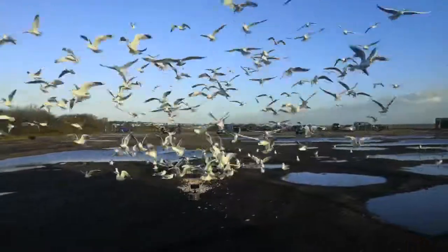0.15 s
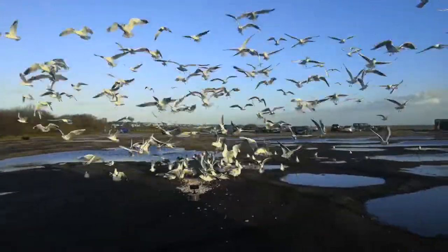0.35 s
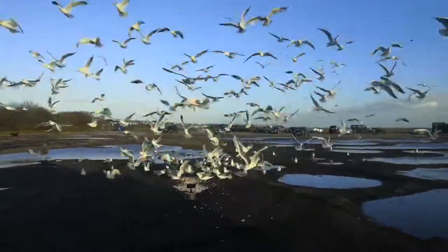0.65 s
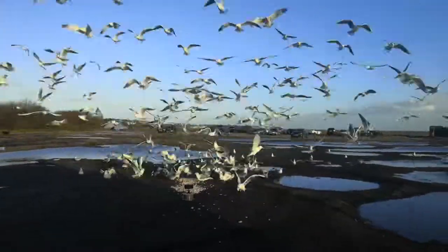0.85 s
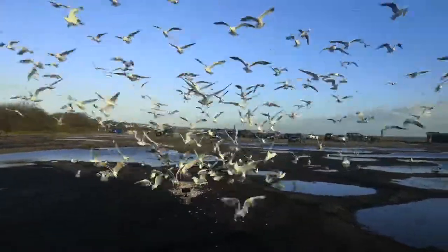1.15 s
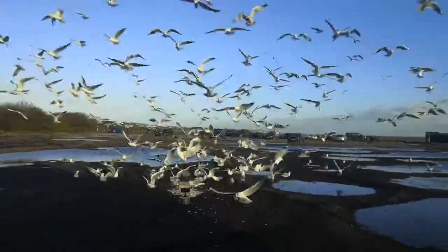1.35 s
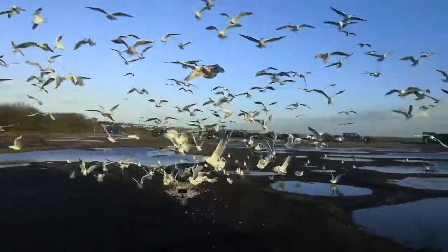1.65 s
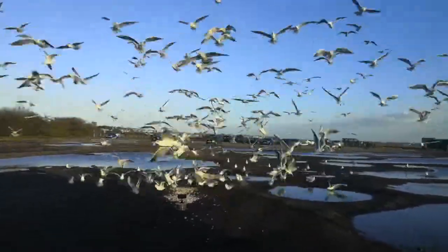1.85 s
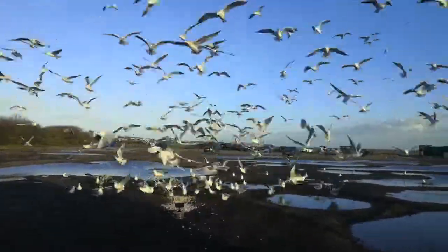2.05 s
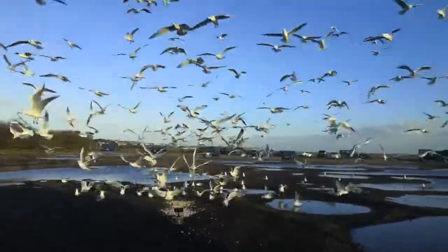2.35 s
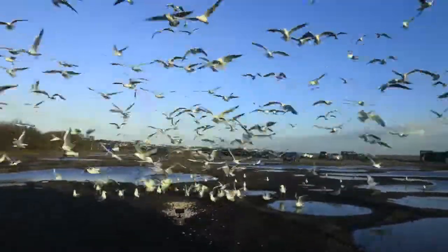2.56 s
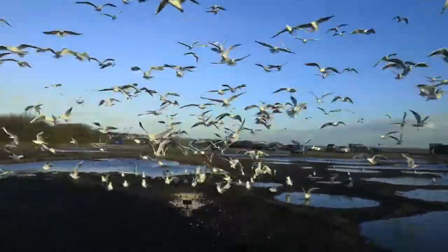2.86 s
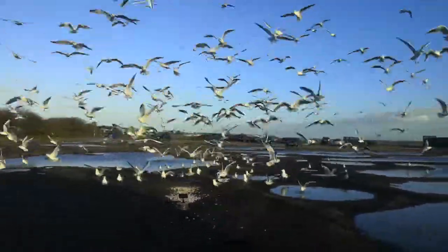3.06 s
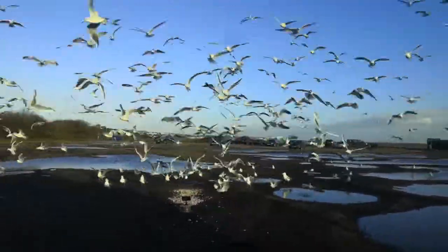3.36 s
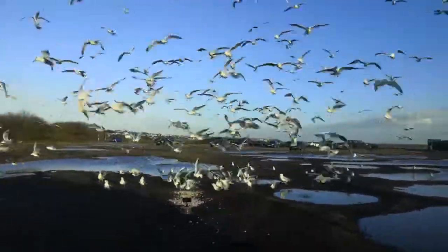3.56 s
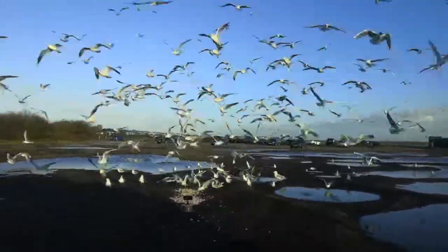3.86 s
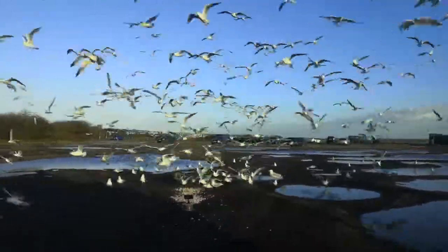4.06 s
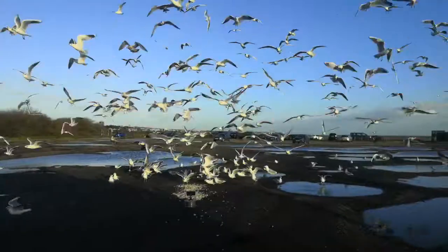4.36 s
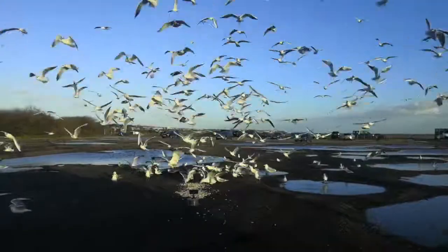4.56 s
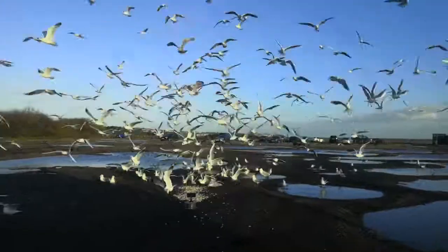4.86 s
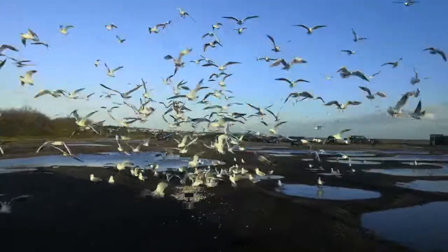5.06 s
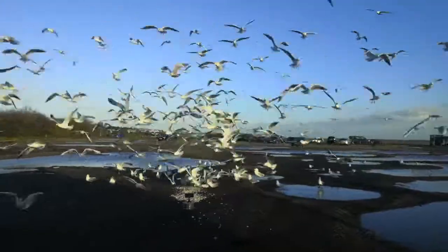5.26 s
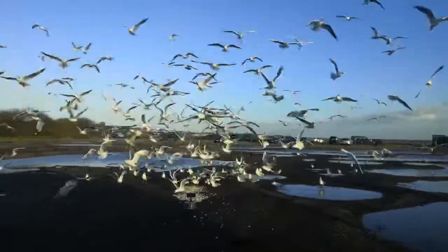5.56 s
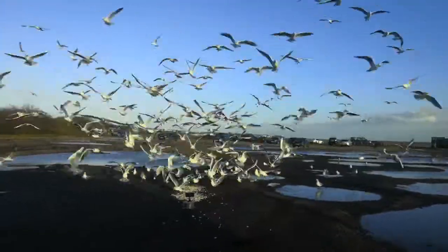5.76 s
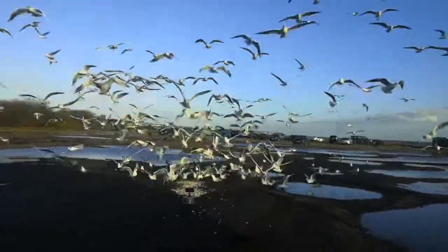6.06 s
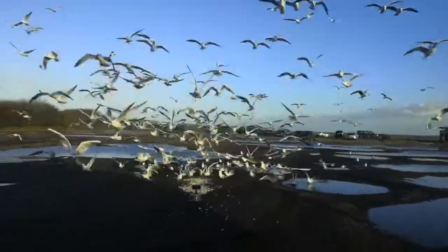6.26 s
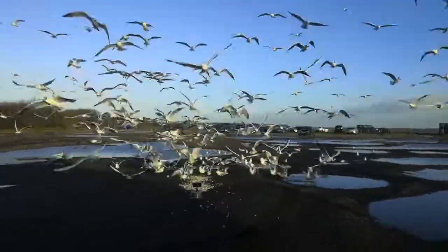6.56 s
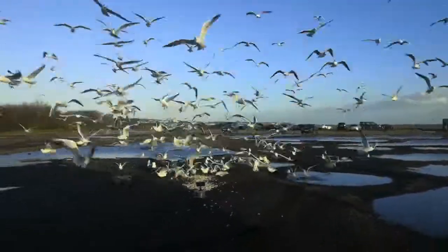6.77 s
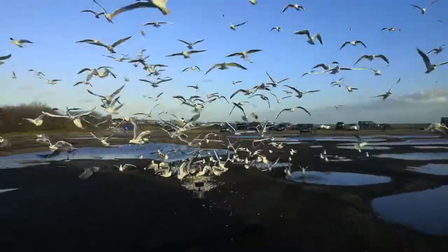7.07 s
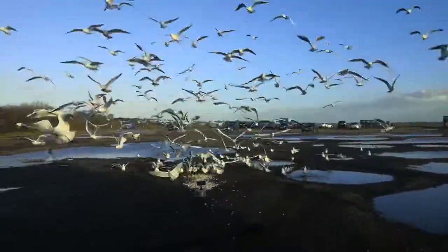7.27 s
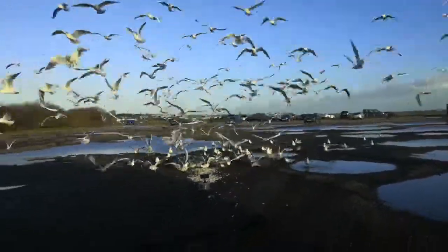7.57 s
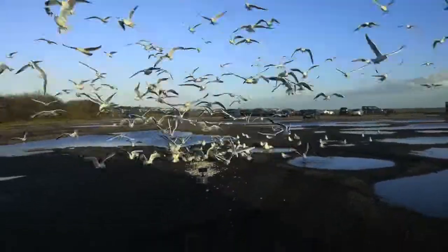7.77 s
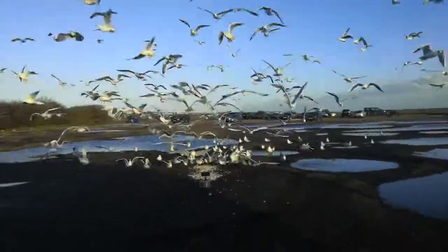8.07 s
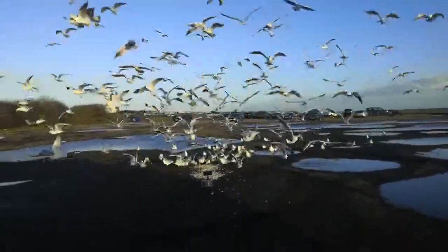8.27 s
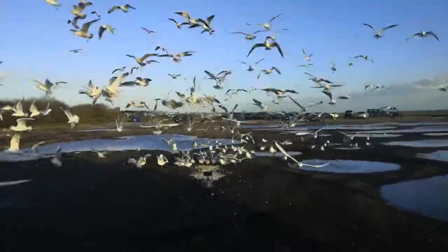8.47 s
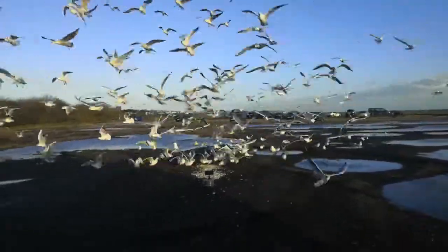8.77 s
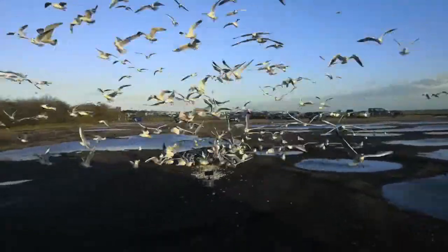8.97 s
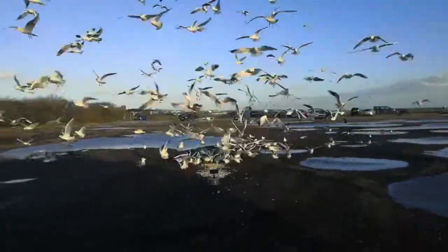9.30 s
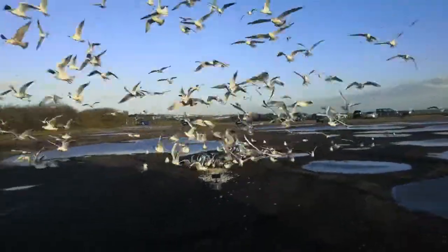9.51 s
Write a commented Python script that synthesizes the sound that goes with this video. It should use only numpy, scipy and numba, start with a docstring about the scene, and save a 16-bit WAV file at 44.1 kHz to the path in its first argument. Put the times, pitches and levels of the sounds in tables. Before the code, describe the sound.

Close, muffled thumps and knocks on a car body stand out over many gulls crying hoarsely in light wind.

```python
"""Gulls over a wet car park

A dense flock screams around two spaced microphones at a car, and near birds stand out of the mass.
Each cry is a harmonic tone from the syrinx, roughened by fluttering membranes and filtered by the throat.
Knocks and thumps excite the damped modes of the bodywork, over gusty wind rumble and far hiss."""
import sys
import numpy as np
from scipy import signal
from scipy.fft import rfft, irfft, next_fast_len
from scipy.io import wavfile
from scipy.ndimage import uniform_filter1d
from numba import njit

SR = 44100
rng = np.random.default_rng(int(sys.argv[2]) if len(sys.argv) > 2 else 0)


def unload_audio(sound):
    """Save the sound as a 16-bit wav file, at the path given as the first command line argument."""
    columns = np.transpose(np.atleast_2d(sound))
    # keep every value between -1 and 1, then stretch to whole-number steps
    steps = np.round(np.clip(columns, -1, 1) * 32767)
    wavfile.write(sys.argv[1], SR, steps.astype(np.int16))


N = 425124
SPACING = 34  # sound travel time between the microphones [samples]


def undb(db):
    """Amplitude ratio of a level in decibels."""
    return 10 ** (np.asarray(db) / 20)


def shape(hz, spectrum):
    """Spectral envelope [dB], interpolated on a logarithmic frequency axis."""
    points_hz, db = np.transpose(spectrum)
    return np.interp(np.log(np.maximum(hz, 1)), np.log(points_hz), db)


def noise(spectrum):
    """White noise filtered by a spectral envelope, at unit rms."""
    size = next_fast_len(N)
    gain = undb(shape(np.fft.rfftfreq(size, 1 / SR), spectrum))
    x = irfft(rfft(rng.standard_normal(size)) * gain, size)[:N]
    return x / x.std()


def jitter(rate):
    """Low-pass random modulation: values held 1 / rate s and smoothed, with a spread near 1."""
    hold = int(SR / rate)
    steps = np.repeat(rng.standard_normal(N // hold + 1), hold)
    return 1.372 * uniform_filter1d(uniform_filter1d(steps, hold), hold)[:N]


def curve(table):
    """Linear interpolation of each column over time."""
    times, *columns = np.transpose(table)
    return [np.interp(np.arange(N) / SR, times, column) for column in columns]


def add(out, x, start, pan_db=0., lag=0):
    """Direction as level and time difference: the left is pan_db louder and lag samples later."""
    for ch, sign in enumerate((1, -1)):
        i = int(start * SR) + max(sign * lag, 0)
        part = x[max(-i, 0):max(N - i, 0)]
        out[ch, max(i, 0):max(i, 0) + len(part)] += part * undb(sign * pan_db / 2)


def highpass(x, hz):
    """Third-order roll-off: 18 dB per octave below the cutoff."""
    return signal.sosfilt(signal.butter(3, hz, "high", fs=SR, output="sos"), x)


@njit
def harmonics(cycles, envelope, gain):
    """Fourier synthesis on a common phase, one column of harmonic gains per output."""
    out = np.zeros((gain.shape[1], len(cycles)))
    for i in range(len(cycles)):
        fundamental = np.exp(2j * np.pi * cycles[i])
        partial = fundamental
        for k in range(len(gain)):
            for band in range(gain.shape[1]):
                out[band, i] += gain[k, band] * partial.imag * envelope[i]
            partial *= fundamental
    return out


def syrinx(length, pitch, filters, shake, hoarse, warble, chance):
    """Source and filter: fluttering membranes modulate a harmonic tone in frequency and amplitude."""
    n = int(length * SR)
    i = int(chance[0] * (N - 2 * n))
    t = np.arange(n) / SR
    glide = np.interp(t, [0, length / 2, length], pitch)
    vibrato = warble * np.sin(2 * np.pi * (24 * t + chance[1]))
    hz = glide * (1 + vibrato + .06 * hoarse ** 3 * shake[i:i + n])
    flutter = np.sin(2 * np.pi * (70 + 60 * chance[2]) * t) + .95 * shake[i + n:i + 2 * n]
    swell = np.sin(np.pi * t / length).clip(0) ** .55
    envelope = swell * undb(7 * hoarse * (np.minimum(flutter, 1.1) - .45))
    partial_hz = np.arange(1, int(11000 / max(pitch))) * pitch[1]
    gains = undb(np.transpose([response(partial_hz) for response in filters]))
    return harmonics(np.cumsum(hz) / SR, envelope, gains)


# Swell of the flock: (time [s], throat band level [dB], shrill band level [dB])
FLOCK_LEVELS = [(0, -73, -66), (.48, -65, -65), (.6, -81, -73.5), (.78, -68, -66), (.92, -87, -76),
                (1.22, -61, -58), (1.42, -84, -75), (1.58, -62, -57.5), (1.7, -73.5, -73),
                (2.3, -79, -74.5), (3.0, -67, -60.5), (3.7, -72.5, -71.5), (4.1, -61.5, -61.5),
                (4.7, -69.5, -69), (5.0, -52.5, -60.5), (5.3, -58, -61.5), (5.75, -67.5, -66.5),
                (6.1, -65.5, -64.5), (7.5, -68, -68), (8.4, -67.5, -68.5), (8.56, -57, -58.5),
                (8.9, -61, -61.5), (9.08, -69, -69.5), (9.64, -70, -63)]
# Spectral envelopes of the two bands: (frequency [Hz], relative level [dB])
THROAT_SPECTRUM = [(410, -61), (700, -51.5), (1130, -18), (1240, -35.5), (1360, -9), (2450, 3), (2730, 1),
                   (3450, -7), (4500, -44.5), (5850, -64.5), (9900, -120)]
SHRILL_SPECTRUM = [(2240, 8), (3800, -1), (4340, -9), (5050, -8.5), (5500, -13), (7740, -11.5),
                   (11000, -14.5), (14300, -58), (22000, -120)]
CRIES_PER_S = 100
YELP_ARCH = np.array([.98, 1, .955])  # pitch ratio at start, middle and end


def flock():
    """Incoherent summation: hundreds of short hoarse cries from all sides merge into one mass."""
    low, high, shake = np.zeros((2, N)), np.zeros((2, N)), jitter(500)
    for chance in rng.random((int(CRIES_PER_S * N / SR), 13)):
        pitch = 560 * 2 ** (1.2 * chance[3]) * (1 + .089 * (chance[4:7] - .5)) * YELP_ARCH
        throat_hz = 1700 * 2 ** (1.21 * chance[10] ** 1.7)  # each bird favours its own bands
        shrill_hz = 4300 * 2 ** (.62 * chance[11])
        filters = [
            lambda f: shape(f, THROAT_SPECTRUM) - 5 * np.minimum((np.log2(f / throat_hz) / .32) ** 2, 3),
            lambda f: shape(f, SHRILL_SPECTRUM) - 5 * np.minimum((np.log2(f / shrill_hz) / .5) ** 2, 3)]
        gain = undb(-2.5 * np.log(chance[7] + .046))
        length, hoarse = .035 + .13 * chance[8] ** 3, .45 + .4 * chance[12]
        throat, shrill = gain * syrinx(length, pitch, filters, shake, hoarse, warble=.012, chance=chance)
        start, side = chance[0] * (N / SR + .2) - .2, 2 * chance[9] - 1
        add(low, throat, start, 5 * side, lag=int(-SPACING * side))
        add(high, shrill, start, 5 * side, lag=int(-SPACING * side))
    bands = highpass([low, high], 1100)  # small throats carry no bass
    levels = uniform_filter1d(curve(FLOCK_LEVELS), SR // 20)
    out = np.zeros((2, N))
    for band, db in zip(bands, levels):
        running_power = uniform_filter1d((band ** 2).mean(0), 9000) + .12 * band.var()
        out += band / np.sqrt(running_power) * undb(db)
    return out


# Strength of the wind: (time [s], level [dB])
WIND_LEVELS = [(0.0, -63), (0.32, -65), (0.46, -59.5), (0.67, -59.5), (1.4, -66.5), (2.04, -63.5),
               (2.25, -63.5), (2.52, -67), (2.76, -66), (4.72, -65.5), (5.83, -60), (6.01, -55.5),
               (6.44, -56.5), (7.14, -59), (7.43, -59), (8.4, -61), (8.59, -59), (9.64, -66)]
# Spectral envelope of the rumble: (frequency [Hz], relative level [dB])
RUMBLE_SPECTRUM = [(12, -20), (20, -2), (43, 0), (75, -7), (134, -4.5), (249, -10), (293, -15.5),
                   (357, -16.5), (745, -33.5), (1000, -43), (1300, -54.5), (2200, -120)]


def wind():
    """Gusty rumble whose coherence between the microphones is greatest in the bass."""
    side_spectrum = [(hz, db + 12 * np.log2(hz / 330) * (hz < 330)) for hz, db in RUMBLE_SPECTRUM]
    common = noise(RUMBLE_SPECTRUM)
    side = undb(-12.5) * np.array([[1], [-1]]) * noise(side_spectrum)
    return (common + side) * undb(curve(WIND_LEVELS)[0] + 1.33 * jitter(14))


# Spectral envelope of the hiss: (frequency [Hz], relative level [dB])
HISS_SPECTRUM = [(180, -50), (300, -15), (734, -3.5), (1270, -5), (2120, 6.5), (2720, -12.5), (3540, -6),
                 (3850, -13.5), (7720, -19.5), (15800, -21.5)]


def far_hiss():
    """Stationary noise, uncorrelated between the microphones."""
    return undb(-67.5) * np.array([noise(HISS_SPECTRUM), noise(HISS_SPECTRUM)])


# Short yelps: (time [s], length [s], pitch [Hz], level [dB], formant / pitch [ratio], treble [dB],
# left minus right [dB])
YELPS = [(0.322, 0.03, 806, -55, 2.4, -17, -4), (0.803, 0.05, 1145, -54, 2.3, -7, 2.5),
         (1.013, .032, 1210, -53, 2, -7, -1), (1.189, 0.038, 1123, -51.5, 2, 0, -1),
         (2.367, 0.028, 1023, -48, 2.42, -18.5, -12.5), (2.44, 0.045, 995, -66, 1.7, -23, -9),
         (2.542, 0.033, 700, -63, 3, -17, -12), (2.888, 0.035, 1226, -59.5, 3, 0, 10),
         (3.083, .032, 698, -52, 2.9, -9, -7), (3.158, 0.038, 1214, -51.5, 3.1, -5, 3),
         (3.229, 0.042, 1183, -58.5, 2.8, -15, 14), (3.489, 0.025, 1187, -55, 2.67, -21, 12),
         (3.547, 0.018, 1150, -57, 2.93, -17, 17), (3.672, 0.039, 1080, -59, 1.84, -21, -12),
         (3.725, 0.024, 1196, -62.5, 3, -12, -4), (3.901, 0.035, 1186, -53.5, 2.9, -12, -1.5),
         (3.97, .038, 1125, -57, 2, -11, 9), (4.014, .032, 1334, -59.5, 2, -24, 12),
         (4.094, 0.087, 1221, -43, 2.14, -17, 1), (4.191, 0.052, 1210, -57.5, 2.5, -17, 7),
         (4.246, 0.033, 1366, -55.5, 2.7, -18, -1.5), (4.299, 0.043, 1340, -54, 2.3, -25, -2),
         (4.502, .035, 1160, -59, 2, -14, 0), (4.778, 0.06, 1278, -59.5, 2.1, -10, 8),
         (4.878, 0.043, 1240, -56, 2, -20, 8), (5.003, 0.049, 1124, -45.5, 2.68, -24, 5),
         (5.157, 0.046, 1293, -55, 2, -19, 17), (5.48, 0.075, 1254, -58, 2, -10, 1),
         (5.952, 0.061, 1030, -52, 2.5, -12, 4), (6.268, 0.04, 907, -61.5, 2, -16, 5.5),
         (6.383, .087, 1430, -76, 2, -2, 7), (6.483, 0.048, 840, -65.5, 4.6, -6, 11),
         (7.906, 0.042, 1090, -56.5, 2, -15, -4.5), (7.956, .029, 1060, -51, 2.3, -18, -6),
         (8.127, 0.035, 1254, -60, 2.1, -17, -3.5), (8.529, 0.079, 1255, -54.5, 3, -10, -6),
         (8.647, 0.035, 1190, -59, 2.5, -18, 3), (8.701, 0.033, 1180, -53, 1.9, 1, 3.5),
         (2.711, 0.025, 1155, -65.5, 4.9, -2, 13), (3.309, 0.034, 1125, -65.5, 4.7, 0, 5),
         (3.63, 0.032, 1230, -67, 2.9, -18, 3.5), (9.02, 0.058, 1206, -63.5, 3, -11, 0),
         (9.405, .05, 1200, -68, 3, -15, 1)]
# Gliding screams: (time [s], length [s], start pitch [Hz], middle pitch [Hz], end pitch [Hz],
# level [dB], formant [Hz], treble [dB], left minus right [dB])
SCREAMS = [(.29, .16, 1010, 1000, 990, -67, 3000, -20, 0), (1.01, .08, 546, 590, 570, -63.5, 5600, 0, 0),
           (1.19, .16, 510, 492, 503, -62, 5400, 0, 0), (1.49, .14, 1350, 1370, 1180, -54.5, 2700, -10, 3),
           (4.16, .1, 920, 890, 860, -57, 1800, -20, 0), (4.2, .15, 1400, 1350, 1300, -60.5, 1350, -20, 0),
           (4.57, .24, 1290, 1320, 1300, -69.5, 5200, -9, 3),
           (4.96, .05, 850, 950, 1090, -54, 2900, -15, 4), (5.05, .07, 1150, 1190, 1310, -53, 4900, -9, 3),
           (5.21, .21, 545, 550, 580, -69.5, 6000, 0, 0), (5.34, .08, 980, 985, 975, -55.5, 2950, -20, 0),
           (5.48, .09, 505, 510, 507, -66, 5300, 0, 0), (6.24, .17, 1220, 1160, 1080, -60, 3500, -15, 0),
           (8.15, .17, 1090, 1200, 1110, -63.5, 3500, -14, -2),
           (9.49, .12, 1720, 1630, 1730, -63.5, 5000, 0, 4)]
# Harsh rasps: (time [s], length [s], level [dB], formant [Hz], left minus right [dB])
RASPS = [(.03, 0.055, -61, 2600, 1), (0.462, 0.044, -58, 2400, 1), (0.813, .04, -53.5, 2930, 6),
         (1.538, 0.09, -57, 2400, 5), (2.468, 0.047, -71, 5370, 4), (2.556, 0.058, -62, 2750, 11.5),
         (2.776, 0.046, -64.5, 5500, 1.5), (4.499, 0.069, -53, 2130, -1), (5.153, 0.049, -52, 3630, 2.5),
         (5.915, .11, -61.5, 5040, 6), (6.479, 0.042, -65, 5660, -6), (6.535, 0.029, -65.5, 5300, 8),
         (7.237, 0.053, -70, 4770, 3), (8.335, 0.035, -67.5, 4800, 5), (8.5, 0.16, -62, 5360, 3),
         (8.842, 0.081, -53.5, 2700, 0.5), (9.3, .06, -63, 3250, 1), (9.417, 0.033, -71, 6200, 9)]
RASP_HZ, RASP_TREBLE_DB = 801, -11.5
YELP_HOARSE, SCREAM_HOARSE, LOW_SCREAM_HOARSE, RASP_HOARSE = .28, .36, .52, .95
LOW_CRY_HZ, FADE_S = 700, .016


def near_gulls():
    """Formant filtering: each cry has a throat resonance and a shrill band near 5 kHz."""
    out, shake = np.zeros((2, N)), jitter(400)
    cries = [(start, length, hz * YELP_ARCH, db, ratio * hz, treble_db, pan_db, YELP_HOARSE)
             for start, length, hz, db, ratio, treble_db, pan_db in YELPS]
    cries += [(start, length, row[:3], *row[3:],
               SCREAM_HOARSE if row[1] > LOW_CRY_HZ else LOW_SCREAM_HOARSE)
              for start, length, *row in SCREAMS]
    cries += [(start, length, [RASP_HZ] * 3, db, formant_hz, RASP_TREBLE_DB, pan_db, RASP_HOARSE)
              for start, length, db, formant_hz, pan_db in RASPS]
    for row, chance in zip(cries, rng.random((len(cries), 3))):
        start, length, pitch, db, formant_hz, treble_db, pan_db, hoarse = row

        def response(hz):
            formant = -7 * (np.log2(hz / formant_hz) / .33) ** 2
            shrill = treble_db - 4 - 6 * (np.log2(hz / 5200) / .25) ** 2
            # low cries alternate strong and weak pulses, so their odd partials are fainter
            odd = np.arange(1, len(hz) + 1) % 2 * (pitch[1] < LOW_CRY_HZ)
            return db + np.maximum(formant, shrill) - 5 * odd
        warble = .005 + .05 * length  # long screams waver more
        cry = syrinx(length + FADE_S, pitch, [response], shake, hoarse, warble, chance)[0]
        add(out, cry, start - FADE_S / 2, pan_db, lag=int(np.clip(-6 * pan_db, -SPACING, SPACING)))
    return highpass(out, 1000)


def ring(modes, t, damping, tilt_db, offset):
    """Modal superposition, peak 1: decaying sinusoids, detuned a little by where the blow lands."""
    hz, db, t60 = np.transpose(modes)[:, :, None]
    tones = undb(db + tilt_db) * np.sin(2 * np.pi * (hz * (1 + .12 * offset) * t + 9 * offset))
    x = (tones * np.exp(-np.log(1000) * damping * t / t60)).sum(0)
    return x / abs(x).max()


# Modes of the bodywork: (frequency [Hz], relative level [dB], t60 at unit damping [s])
BOOM_MODES = [(37.47, 4.5, 0.57), (47, 2.5, .35), (63, 2.5, 0.27)]
BODY_MODES = [(89, -11, 0.33), (93.2, 6.5, 0.19), (109, 0.5, 0.25), (123.75, 3.5, 0.3), (138.6, -9, 0.45),
              (181.2, 0.5, 0.06)]
PANEL_MODES = [(190, -4, 0.1), (247.7, 2.5, 0.096), (322, -12, 0.13), (374.7, -6.5, 0.085),
               (429.4, -14.5, 0.1)]
RATTLE_MODES = [(497, 3, 0.062), (628, 10, 0.027), (810, 1.5, 0.041), (938, 3, 0.041), (1182, -1.5, 0.058)]
CLACK_MODES = [(1627, -2.5, 0.044), (1924, -6, .05), (2019, -1.5, 0.037), (2152, 0, 0.05),
               (3236, -3.5, 0.026)]
# Spectral envelope of the crack of contact: (frequency [Hz], relative level [dB])
CRACK_SPECTRUM = [(1470, -8), (2500, -4), (3970, -9), (8000, -7.5), (8640, -13), (9330, -11),
                  (10600, -30.5), (14800, -29), (15800, -48)]
# Ringing knocks, in relative levels:
# (time [s], body [dB], boom [dB], panel [dB], rattle [dB], clack [dB], crack [dB])
KNOCKS = [(.031, -75, -58, -39, -72, -52.5, -61), (.24, -57, -61, -29.5, -46, -59, -58),
          (.28, -50, -55, -36, -49, -56, -62), (.315, -49, -60, -41, -47, -49, -66),
          (.465, -55, -55, -36.5, -44, -57, -58.5), (.491, -47, -46, -32.5, -54, -47.5, -53.5),
          (0.635, -37.5, -50, -29.5, -40, -52, -51.5), (.655, -36, -49, -28, -42, -58, -43),
          (0.672, -35.5, -54, -45, -60, -53, -62), (0.725, -52, -55, -45.5, -66, -53.5, -57),
          (0.815, -48, -46.5, -37.5, -49.5, -60, -67), (1.033, -53, -70, -44, -53, -49.5, -70),
          (1.085, -44.5, -73, -40, -51, -37, -48.5), (1.16, -50.5, -65, -41.5, -47, -53, -62),
          (1.355, -49.5, -59, -49.5, -48, -53, -58.5), (1.372, -43, -60, -46, -43, -49, -60),
          (1.394, -44, -54, -31.5, -36, -37, -49.5), (1.572, -38, -57, -37.5, -43.5, -54, -52),
          (1.801, -38.5, -64, -49, -53, -55, -66), (1.812, -49, -46, -38, -39.5, -42, -40),
          (2.027, -19, -24, -20.5, -39, -46, -48), (2.261, -18.5, -21, -10, -24.5, -19, -30.5),
          (3.004, -67, -81, -51, -48, -56, -61), (4.973, -51, -44.5, -64, -77, -68, -81)]
# Muffled thumps: (the columns of KNOCKS, struck panel frequency [Hz])
THUMPS = [(5.904, -17.5, -22.5, -32.5, -41, -68, -47, 104.7),
          (6.342, -47.5, -58, -44.5, -58, -60, -77, 143), (6.752, -20, -28, -30, -46.5, -56, -54.5, 105.7),
          (6.961, -21, -26.5, -30.5, -48, -69, -65, 104), (7.18, -18.5, -28, -32, -46, -68, -59.5, 107.5),
          (7.596, -19.5, -28, -35, -36.5, -51.5, -55.5, 100.6),
          (8.051, -31, -35, -17.5, -27.5, -36, -47.5, 172), (8.469, -35.5, -47, -39, -56, -59, -62, 116),
          (8.487, -20.5, -24, -31, -40, -64, -49.5, 105.8),
          (8.734, -25, -32, -18.5, -20, -27.5, -39.5, 108), (8.981, -30, -36, -37.5, -49, -64, -80, 136),
          (9.212, -22.5, -39, -22.5, -38.5, -46, -55.5, 120)]
# Contact: (push [ms], damping [ratio], time until a hand mutes it [ms], scrape at a -47 dB crack [ms])
KNOCK_CONTACT, THUMP_CONTACT = (14, .73, 54, 35.3), (12.1, 1.02, 27.4, 34.8)
KNOCK_PANEL_HZ, SHUDDER_DB, SHUDDER_T60_S = 130, -23, .37


def bodywork_blows():
    """Impact excitation: low modes reach both microphones alike; rattle, clack and crack differ."""
    out, t = np.zeros((2, N)), np.arange(SR // 3) / SR
    grit = np.array([noise(CRACK_SPECTRUM), noise(CRACK_SPECTRUM)]) * undb(3.3 * jitter(600))
    body_hz = np.array(BODY_MODES)[:, :1]
    rumble = noise(RUMBLE_SPECTRUM)
    blows = [(*row, KNOCK_PANEL_HZ, *KNOCK_CONTACT) for row in KNOCKS]
    blows += [(*row, *THUMP_CONTACT) for row in THUMPS]
    for row, chance in zip(blows, rng.random((len(blows), 4, 5, 1)) - .5):
        start, body_db, boom_db, panel_db, rattle_db, clack_db, crack_db = row[:7]
        struck_hz, push_ms, damping, mute_ms, scrape_ms = row[7:]
        i = int(start * SR)
        stretch = slice(i // 2, i // 2 + len(t))
        rise = 1 - np.exp(-(t / push_ms * 1000) ** 2)
        mute = .036 + np.exp(-(t / mute_ms * 1000) ** 2)
        coupling_db = -6 * (np.log2(body_hz / struck_hz) / .3) ** 2
        body = rise * mute * ring(BODY_MODES, t, damping, coupling_db, 0)
        boom = rise ** 2 * (mute + .13) * ring(BOOM_MODES, t, damping, 0, 0)
        bass = -undb(body_db) * body / abs(body).max() - undb(boom_db) * boom / abs(boom).max()
        add(out, bass, start - .005, lag=int(18 * chance[2, 0, 0]))
        panel = undb(panel_db) * np.sqrt(rise) * ring(PANEL_MODES, t, damping, 4 * chance[0],
                                                      .12 * chance[1])
        add(out, panel, start - .004, 1.5 * chance[0, 0, 0], lag=int(44 * chance[1, 0, 0]))
        shudder = rise * undb(body_db + SHUDDER_DB - 60 * t / SHUDDER_T60_S) * rumble[stretch]
        add(out, shudder, start)  # the car rumbles on after each blow
        scrape_ms *= 2 ** (-(crack_db + 47) / 37)  # harder blows scrape more briefly
        scrape = np.minimum(t / .0019, 1) * undb(-20 * t / scrape_ms * 1000)
        crack_envelope = scrape + .04 * undb(-60 * t / .12)
        for ch in range(2):
            rattle = ring(RATTLE_MODES, t, 25 / scrape_ms, 8 * chance[0], chance[2 + ch])
            clack = ring(CLACK_MODES, t, 25 / scrape_ms, 8 * chance[1], chance[3 - ch])
            clatter = undb(rattle_db) * rattle + undb(clack_db + 5.5) * clack
            crack = undb(crack_db + 2.5 * ch) * crack_envelope * grit[ch, stretch]
            out[ch, i:i + len(t)] += (clatter * np.minimum(t / .0028, 1) + crack)[:N - i]
    return out


def reflections(cries, t60=.2):
    """Reverberation by convolution: wet tarmac and far sheds smear the cries a little."""
    tail = rng.standard_normal((2, 6000)) * undb(-33 - 60 * np.arange(6000) / SR / t60)
    return signal.fftconvolve(cries, tail, axes=1)[:, :N]


def scene():
    """Linear superposition of all sources at the two microphones."""
    gulls = near_gulls() + flock()
    return gulls + reflections(gulls) + bodywork_blows() + wind() + far_hiss()


def record(dry):
    """Band limiting: the microphones lose the deepest bass and the recorder cuts the top."""
    lowpass = signal.ellip(10, .2, 70, 15750, fs=SR, output="sos")
    return signal.sosfilt(lowpass, highpass(dry, 37))


dry = scene()
out = record(dry)
unload_audio(out)
```